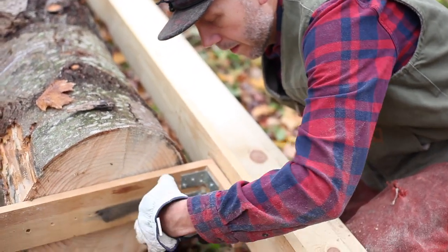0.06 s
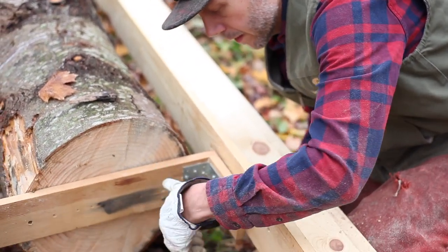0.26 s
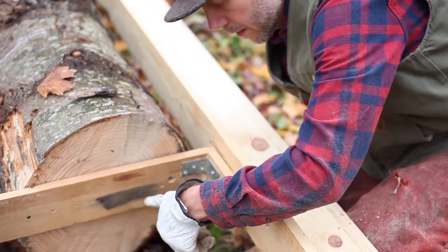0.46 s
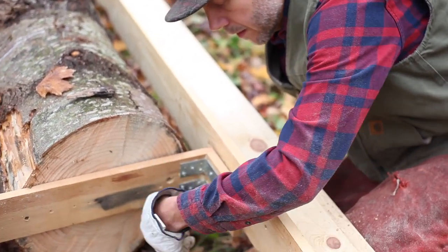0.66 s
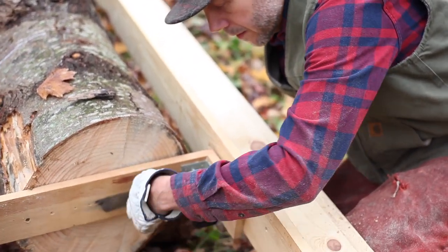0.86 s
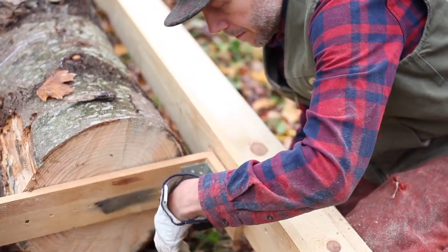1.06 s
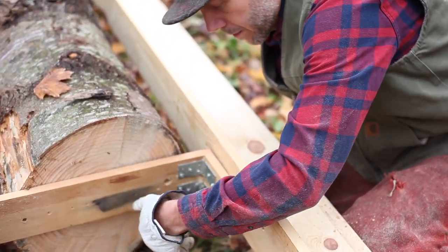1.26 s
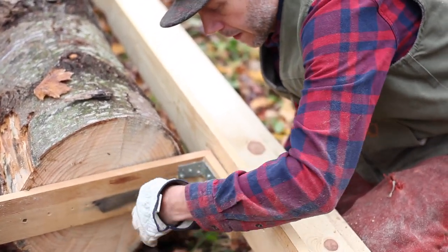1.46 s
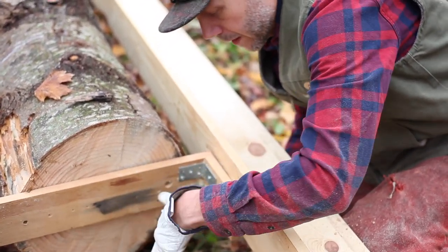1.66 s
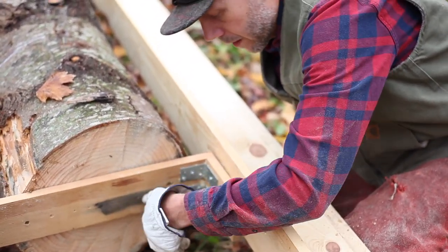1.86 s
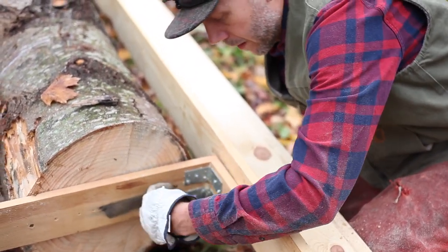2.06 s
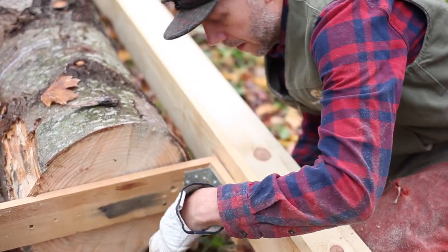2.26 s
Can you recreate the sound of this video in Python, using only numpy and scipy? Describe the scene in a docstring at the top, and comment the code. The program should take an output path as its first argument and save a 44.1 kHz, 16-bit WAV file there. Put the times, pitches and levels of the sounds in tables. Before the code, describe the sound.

Sharp metal clamp clicks and woody knocks, close up, with rubbing, scraping and fabric rustle outdoors

```python
"""A steel clamp snaps and clicks, worked by a gloved hand on the wooden guide frame of a sawmill.
Snaps ring damped modes of clamp and frame; boards knock with the same modes, struck more softly.
The jaw rubs, the thread grinds, and glove and sleeve rustle: shaped friction noise over outdoor rumble.
Close by, the snaps can overload the microphone; its gain control ducks the sound and recovers slowly."""
import sys
import numpy as np
from scipy import signal
from scipy.fft import rfft, irfft
from scipy.io import wavfile
from scipy.ndimage import uniform_filter1d

SR = 44100
rng = np.random.default_rng(int(sys.argv[2]) if len(sys.argv) > 2 else 0)


def to_wav(sig):
    """Store sig (one row per channel, or 1-D mono) as 16-bit WAV at the path in sys.argv[1].

    Samples outside -1..1 are clipped; the rate is SR.
    """
    pcm = np.clip(np.atleast_2d(sig), -1, 1) * 32767
    pcm = np.round(pcm).astype(np.int16)
    wavfile.write(sys.argv[1], SR, pcm.T)  # frames by channels


N = 101429


def amp(db):
    """Logarithmic level: converts decibels to an amplitude ratio."""
    return 10 ** (np.asarray(db) / 20)


def evened(x):
    """Power normalisation: scales a signal to rms 1."""
    return x / np.sqrt(np.mean(x ** 2) + 1e-20)


def read(points, hz):
    """Logarithmic frequency scale: interpolates a tabulated curve between its points."""
    f, value = np.transpose(points)
    return np.interp(np.log(hz + 1), np.log(f + 1), value)


def level(points):
    """Level envelope: interpolates decibels over time and returns the gain at every sample."""
    times_s, levels_db = np.transpose(points)
    return amp(np.interp(np.arange(N) / SR, times_s, levels_db))


def add(mix, start_s, sound):
    """Superposition: adds a sound to the mix at its start time."""
    part = mix[round(start_s * SR):][:len(sound)]
    part += sound[:len(part)]


def colour(x, points, size=4096):
    """Minimum-phase filtering: the log gain alone fixes the phase of a causal response."""
    hz = abs(np.fft.fftfreq(size, 1 / SR))
    log_gain = np.log(amp(read(points, hz)))
    response = np.exp(np.conj(signal.hilbert(log_gain)))
    taps = np.fft.ifft(response).real[:size // 2]
    return signal.fftconvolve(x, taps)[:len(x)]


def drift(cutoff_hz):
    """Band-limited random fluctuation: noise below the cutoff, at rms 1."""
    spectrum = rfft(rng.standard_normal(N))
    kept = np.fft.rfftfreq(N, 1 / SR) < cutoff_hz
    return evened(irfft(spectrum * kept, N))


def friction(grain_db, cutoff_hz):
    """Friction as many tiny slips: white noise with a random, rapidly varying gain."""
    noise = rng.standard_normal(N)
    return evened(noise * amp(grain_db * drift(cutoff_hz)))


def ring(modes, length, size=8192):
    """Modal superposition: exponentially decaying sines, each starting at a random phase."""
    t = np.arange(size) / SR
    hz, peak_db, t60_s = np.transpose(modes)[:, :, None]
    tau_s = t60_s * length / np.log(1000)
    height = 2 * amp(peak_db) / (tau_s * SR)  # makes peak_db the height of the spectral peak
    turns = hz * t + rng.random(hz.shape)
    return (height * np.exp(-t / tau_s) * np.sin(2 * np.pi * turns)).sum(0)


def softened(hit, rise_s):
    """Finite contact time: a glancing contact swells instead of starting at once."""
    t = np.arange(len(hit)) / SR
    return hit * (1 - np.exp(-t / rise_s))


# decay of the dense small modes: pitch_hz [Hz], t60_s [s]
SPLINTER_DECAY = [(200, 0.16), (700, 0.18), (1500, 0.07), (3000, 0.049), (6000, 0.019), (14000, 0.028)]


def splinter(length, size=8192):
    """High modal density: decaying noise, flat in spectrum, with its own decay time at each pitch."""
    hz, t, bands = signal.stft(rng.standard_normal(size), SR, nperseg=128)
    t60_s = length * read(SPLINTER_DECAY, hz)[:, None]
    fade = amp(-60 * t / t60_s)
    bands *= fade / np.linalg.norm(fade, axis=1, keepdims=True)  # equal energy in every band
    x = signal.istft(bands, SR)[1][:size]
    return x / np.linalg.norm(x)


def crack(decay_s, size=8192):
    """Contact noise: the brief chatter of two surfaces meeting, as decaying noise."""
    t = np.arange(size) / SR
    x = rng.standard_normal(size) * np.exp(-t / decay_s)
    return x / np.linalg.norm(x)


# spectrum of the outdoor rumble: pitch_hz [Hz], level_db [dB, relative]
AIR_COLOUR = [(20, -15), (45, -12), (66, -1), (95, -7), (190, -1), (300, -7.5), (450, -14.5), (1500, -19.5),
              (6000, -30), (16000, -43)]


def air(level_db=-46, swell_db=1.5):
    """Broadband ambient noise: low outdoor rumble with a randomly swelling level."""
    swell = amp(level_db + swell_db * drift(8))
    return swell * evened(colour(rng.standard_normal(N), AIR_COLOUR))


# level of glove and sleeve, before patchiness: time_s [s], level_db [dB]
RUSTLE_LEVEL = [(0, -45), (.06, -47), (.14, -46), (.2, -39.5), (.25, -44), (.3, -49.5), (.58, -48.5),
                (.67, -40), (.75, -42), (.84, -46.5), (1.0, -47.5), (1.08, -46), (1.38, -49), (1.52, -47),
                (1.88, -49.5), (2.08, -46), (2.19, -41.5), (2.3, -50)]
# spectrum of the fabric: pitch_hz [Hz], level_db [dB, relative]
RUSTLE_SPECTRUM = [(300, -3.5), (1500, -3), (3000, -2.5), (4500, 1.5), (7300, -2), (8600, -10.5),
                   (10000, -18), (13000, -26), (16000, -36)]


def rustle(patchy_db=1.43):
    """Sliding friction of fabric: glove and sleeve slide as the hand turns, a patchy hiss."""
    patches = amp(patchy_db * drift(40))
    fabric = evened(colour(friction(grain_db=0.5, cutoff_hz=420), RUSTLE_SPECTRUM))
    return level(RUSTLE_LEVEL) * patches * fabric


# glove scuffs: start_s [s], length_s [s], level_db [dB], centre_hz [Hz], width_octaves [octaves]
GLOVE_SCUFFS = [(0.801, 0.017, -34.5, 6670, 0.25), (1.27, 0.069, -48, 5000, 0.47),
                (1.346, 0.0064, -43.5, 8200, 0.18), (1.753, 0.0035, -57, 7000, 0.85),
                (1.995, 0.049, -29, 5370, .5)]


def scuffs(edge=0.58, skirt_db=-24, grit_db=2):
    """Band-limited friction: the glove slips quickly over the handle in short bright zips."""
    out = np.zeros(N)
    hz = np.geomspace(100, 16000, 60)
    for start_s, length_s, level_db, centre_hz, width_octaves in GLOVE_SCUFFS:
        octaves_off = np.log2(hz / centre_hz)
        hump = np.exp(-.5 * (octaves_off / width_octaves) ** 2) + amp(skirt_db)
        spectrum = list(zip(hz, 20 * np.log10(hump)))
        slip = colour(friction(grain_db=grit_db, cutoff_hz=900), spectrum)[:int(length_s * SR)]
        shaped = slip * signal.windows.tukey(len(slip), edge)  # edge: share of the length that fades
        add(out, start_s, amp(level_db) * evened(shaped))
    return out


# modes of the wooden frame: pitch_hz [Hz], peak_db [dB, relative], t60_s [s]
FRAME_MODES = [(228.5, 1, 0.17), (260, 2.5, 0.11), (324, 7.5, 0.11), (511, 4, 0.1), (605, 1.5, 0.18),
               (702.5, -1, 0.15), (820, -5, 0.023), (953, 2, 0.068), (1045, 0, 0.12), (1159, -4, 0.032),
               (1373, -10, 0.026), (1389.4, 4.5, 0.044), (1607, 5.5, 0.047), (1700, -5, 0.18),
               (1824, 4, .045)]
# modes of the clamp's screw and handle: pitch_hz [Hz], peak_db [dB, relative], t60_s [s]
CLAMP_MODES = [(2120, 7, 0.016), (2358, 0, 0.026), (2927, 3, 0.034), (3213, 5, 0.03), (3695, 9, 0.046),
               (4295, 9.5, 0.027), (4862, 6.5, 0.018), (5205, 4, 0.012), (5954, 3.5, 0.056),
               (6800, 6, 0.011), (7710, 4.5, 0.013), (9880, 2.5, .02)]
# level of the clamp on the wood, before patchiness: time_s [s], level_db [dB]
RUB_LEVEL = [(0, -57), (.09, -43), (.15, -44), (.215, -34), (.245, -30), (.27, -51), (.34, -58),
             (.62, -48.5), (.75, -40), (.84, -45.5), (1.0, -51.5), (1.3, -48), (1.55, -47.5), (1.68, -51.5),
             (1.89, -52), (1.99, -39), (2.07, -51.5), (2.23, -42), (2.3, -48)]
# spectral shaping of the rub: pitch_hz [Hz], gain_db [dB, relative]
RUB_SPECTRUM = [(100, -24.5), (250, 5), (450, -0.5), (900, 6.5), (1250, 2.5), (1650, 1.5), (2100, -5),
                (3000, -4), (4400, -10), (7000, -12), (12000, -22)]


def rubbing(direct_db=-6, patchy_db=1.6):
    """Friction-driven resonance: the clamp drags on the wood and keeps frame and clamp ringing."""
    slips = friction(grain_db=2.5, cutoff_hz=400)
    resonance = signal.fftconvolve(slips, ring(FRAME_MODES + CLAMP_MODES, 0.46))[:N]
    rub = evened(colour(resonance + amp(direct_db) * slips, RUB_SPECTRUM))
    return level(RUB_LEVEL) * amp(patchy_db * drift(35)) * rub


# level of the screw thread, before patchiness: time_s [s], level_db [dB]
GRIND_LEVEL = [(0, -59.5), (.12, -58), (.21, -45), (.27, -63), (.6, -58), (.75, -40), (.8, -54), (1.0, -66),
               (1.16, -52), (1.33, -54.5), (1.55, -57.5), (1.67, -46.5), (1.8, -54.5), (1.89, -64),
               (1.99, -40), (2.08, -54), (2.27, -51)]
# narrow resonance of the wooden frame near 1.6 kHz: pitch_hz [Hz], level_db [dB, relative]
GRIND_SPECTRUM = [(200, -42), (1100, -28.5), (1400, -9), (1570, 3.5), (1720, 1.5), (1900, -8.5),
                  (2400, -28.5), (4000, -33), (12000, -49)]


def grinding(patchy_db=3.5):
    """Stick-slip excitation: grainy noise of the thread through one narrow resonance of the wood."""
    patches = amp(patchy_db * drift(40))
    thread = evened(colour(friction(grain_db=1.5, cutoff_hz=630), GRIND_SPECTRUM))
    return level(GRIND_LEVEL) * patches * thread


# centres of the knock strengths: pitch_hz [Hz]
KNOCK_BANDS = (260, 520, 1000, 1600, 2750, 4500)
# board knocks: start_s [s], rise_s [s, time constant], length [factor on the t60],
# then strength_db [dB] at each of KNOCK_BANDS
BOARD_KNOCKS = [(.0400, .004, 0.57, -3.5, -2, 3.5, 0, -14, -14),
                (0.092, 0.0025, 0.93, 16, 10, 3, 1, -6, -18), (.1110, 0.0018, 0.85, 1, 1, 0, 6, -18, -12),
                (0.3718, 0.0018, 0.64, -8, -1, 18, 12, -19, 1),
                (.4530, 0.00093, 0.55, 21, 20, 23, 28, 11, 6),
                (.4575, 0.00068, 0.73, 29, 15, 29, 13.5, 2, -17),
                (0.498, 0.0023, 0.37, 4, 2, -18, 3, -8, -8), (.7370, 0.0045, 1.5, -11, -3, 0, 2, 0, -5),
                (0.895, 0.00061, 0.54, -5, -4, 3, 10, -8, -12),
                (1.637, 0.004, 0.89, 7.5, 6, 2.5, 5, -10, -33),
                (1.961, 0.0013, 0.9, 16, 11, 12.5, 12, 1, -2.5),
                (1.97, 0.0027, 0.58, 10.5, -2.5, -9, 14, -32, -6),
                (1.995, 0.004, 1., -10, -21, -12, 13, -23, -30.5),
                (2.145, 0.0021, 0.66, 10.5, -1, -7, -10, -10, -25)]


def knocks(splinter_db=-10):
    """Impact with a soft onset: the boards bump together, a dull blow ringing frame and clamp."""
    out = np.zeros(N)
    for start_s, rise_s, length, *strength_db in BOARD_KNOCKS:
        hit = ring(FRAME_MODES + CLAMP_MODES, length) + amp(splinter_db) * splinter(length)
        low, high = strength_db[0], strength_db[-1]
        bass = [(90, low - 20), (180, low - 1)]
        treble = [(7500, high - 1), (12000, high - 32)]
        spectrum = [*bass, *zip(KNOCK_BANDS, strength_db), *treble]
        add(out, start_s, colour(softened(hit, rise_s), spectrum))
    return out


# modes of the clamp's flat steel bar: pitch_hz [Hz], peak_db [dB, relative], t60_s [s]
BAR_MODES = [(2520, -9, 0.038), (3440, 11, 0.035), (3552, 1, 0.078), (4690, 11, 0.011),
             (4810, -13.5, 0.034), (5260, -10, 0.11), (5220, 5.5, 0.014), (5770, 0, 0.0086),
             (6760, -0.5, 0.034), (8600, -1, 0.033)]
# centres of the click strengths: pitch_hz [Hz]
CLICK_BANDS = (250, 700, 1350, 2000, 2700, 3600, 5000, 8000)
# steel contacts: start_s [s], rise_s [s, time constant], length [factor on the t60],
# bar_share [0-1, power], then strength_db [dB] at each of CLICK_BANDS
STEEL_CLICKS = [(.2215, 0.00019, .8, 0.17, 12, 17, 22, 17, 21, 20.5, 29.5, 20),
                (0.242, 0.00068, 0.57, 0.44, 8, 8, 12, -18, -14, 5, 0, -5),
                (0.4261, 0.0012, 1.46, .05, 5, 15, 12, 0, 12, 7, 6.5, -6),
                (0.449, 0.00046, 1.8, .1, -6, -19, -0.5, 9, -5, 10.5, 13, -5),
                (0.777, 0.00013, 1.11, 0.92, 9, 14.5, 29, 13, 27.5, 19, 22.5, 12),
                (0.7836, 0.00039, 1, 0.7, 4, -1, 15, 4, -2, 8, 20, 4),
                (0.9062, 0.00021, 0.89, 0.07, -1, 6, 12, 20, 13.5, 19.5, 12, 8),
                (0.908, 0.000091, 0.71, 0.035, -12.5, 8, -6, 5, -11, 13, 11, -2),
                (1.347, .0005, .6, 0.44, -33, -32, -28, -26.5, -25, -28, -12, -2),
                (1.581, 0.0015, 0.31, 0.41, -18, -19, -2, -7, -16, -20, -6, -22),
                (2.264, 0.0023, 0.8, .1, 1.5, 4.5, 7, 7, -4, -8, 1, -6),
                (2.296, 0.0016, 1., 0.54, -13, -8, 6, -7, -3, 1, -7.5, -6)]


def clicks(splinter_db=-11, crack_db=-8, crack_s=0.00094):
    """Impact excitation of coupled bodies: steel meets steel; screw and bar ring and shake the frame."""
    out = np.zeros(N)
    for start_s, rise_s, length, bar_share, *strength_db in STEEL_CLICKS:
        screw = np.sqrt(1 - bar_share) * ring(CLAMP_MODES, length)
        bar = np.sqrt(bar_share) * ring(BAR_MODES, length)
        hit = ring(FRAME_MODES, length) + screw + bar
        hit += amp(splinter_db) * splinter(length) + amp(crack_db) * crack(crack_s)
        low, high = strength_db[0], strength_db[-1]
        treble = [(10500, high - 13.5), (16000, high - 29)]
        spectrum = [(70, low - 34), *zip(CLICK_BANDS, strength_db), *treble]
        add(out, start_s, colour(softened(hit, rise_s), spectrum))
    return out


def scene():
    """Linear superposition: all sources sum at one microphone."""
    return (clicks() + knocks() + rubbing() + grinding() + rustle() + scuffs() + air())[None]


def record(dry, threshold_db=-19, recover_db_per_s=8, attack_s=0.011, share=0.69, ceiling=1, edge_hz=15900):
    """Automatic gain control: a slow attack lets snaps overload, then ducks what follows; then a low-pass."""
    power = uniform_filter1d(np.clip(dry[0], -1, 1) ** 2, size=300)  # window in samples
    power_db = 10 * np.log10(abs(power) + 1e-12)
    # peak hold that falls at a steady rate
    fall_db = np.arange(N) / SR * recover_db_per_s
    held_db = np.maximum.accumulate(power_db + fall_db) - fall_db
    over_db = np.maximum(held_db - threshold_db, 0)
    # the gain follows the excess with a lag
    r = np.exp(-1 / (attack_s * SR))
    duck_db = share * signal.lfilter([1 - r], [1, -r], over_db)
    x = np.clip(dry[0] * amp(-duck_db), -ceiling, ceiling)
    low_pass = signal.firwin(255, edge_hz, window=("kaiser", 8), fs=SR)
    return signal.fftconvolve(x, low_pass, "same")[None]


dry = scene()
out = record(dry)
to_wav(out)
```